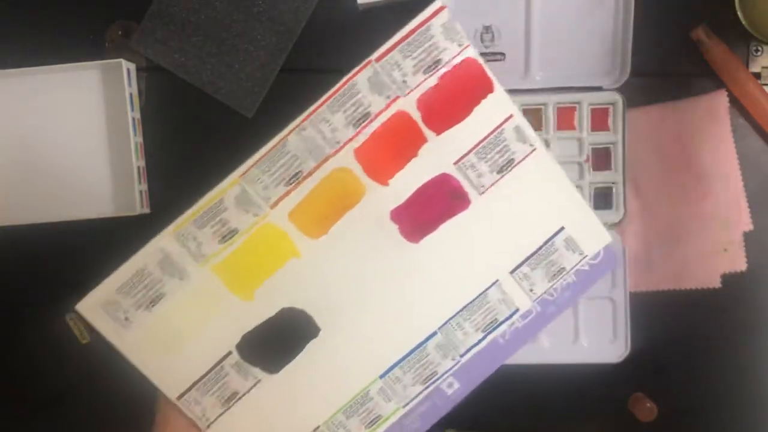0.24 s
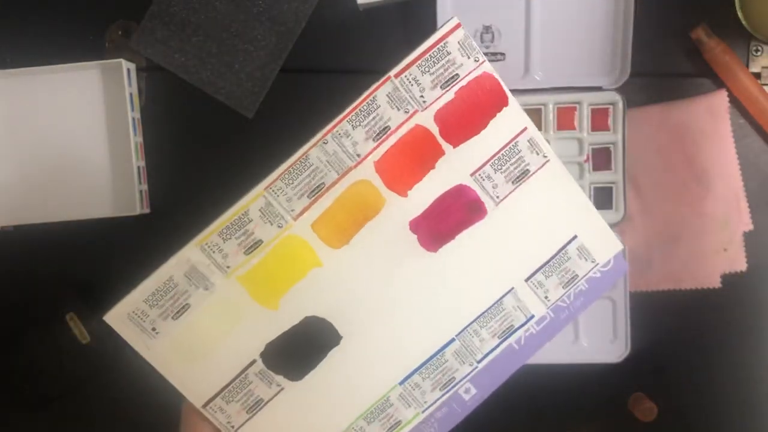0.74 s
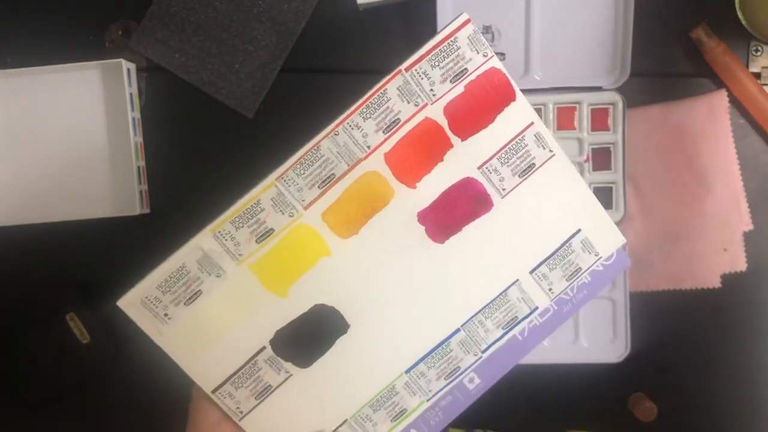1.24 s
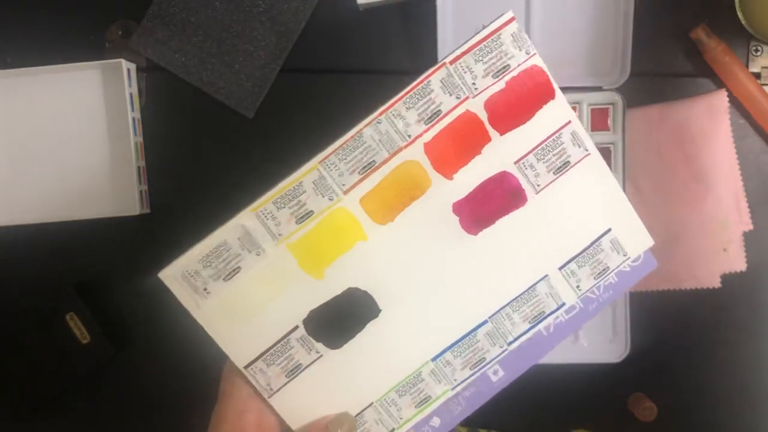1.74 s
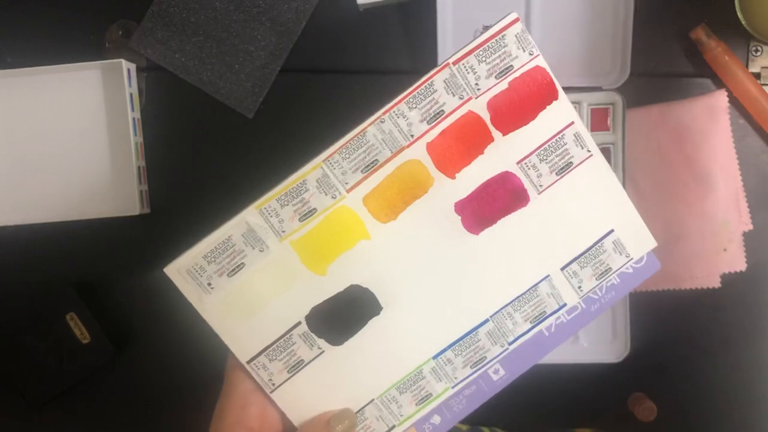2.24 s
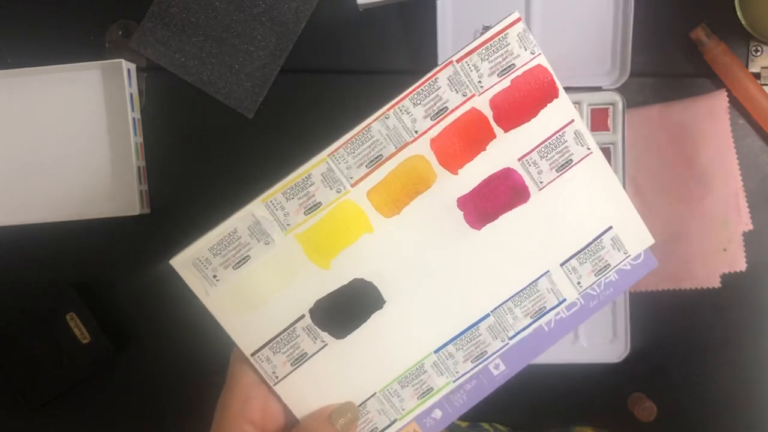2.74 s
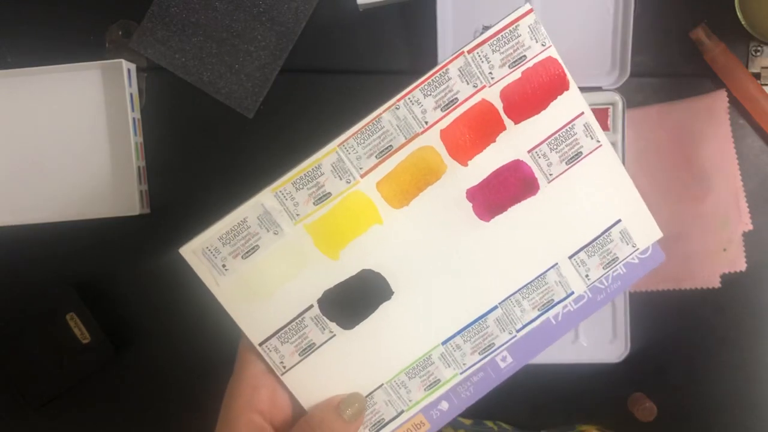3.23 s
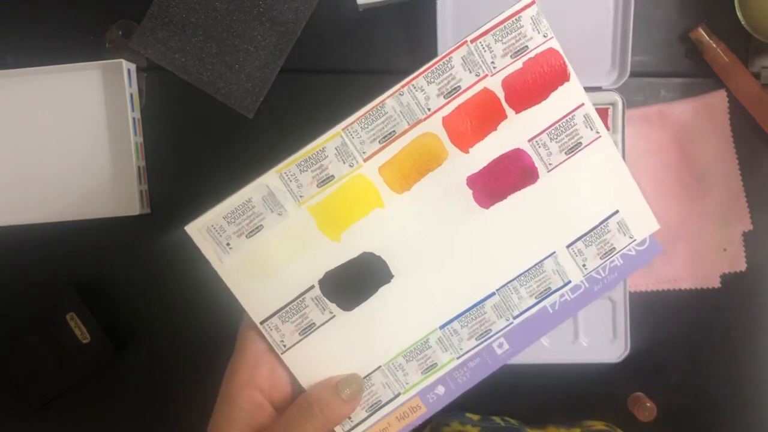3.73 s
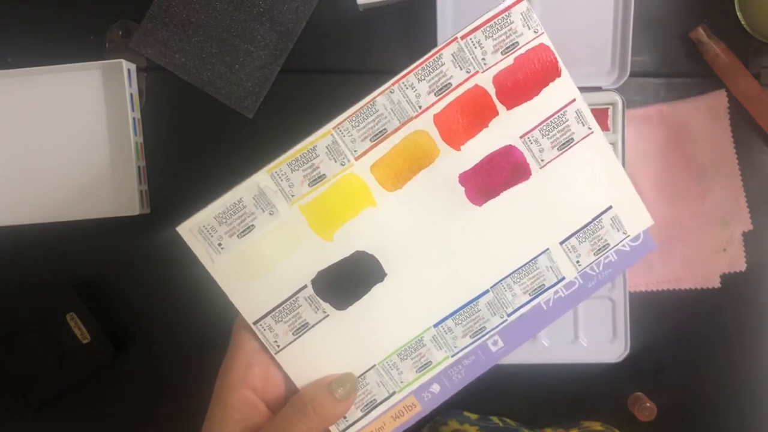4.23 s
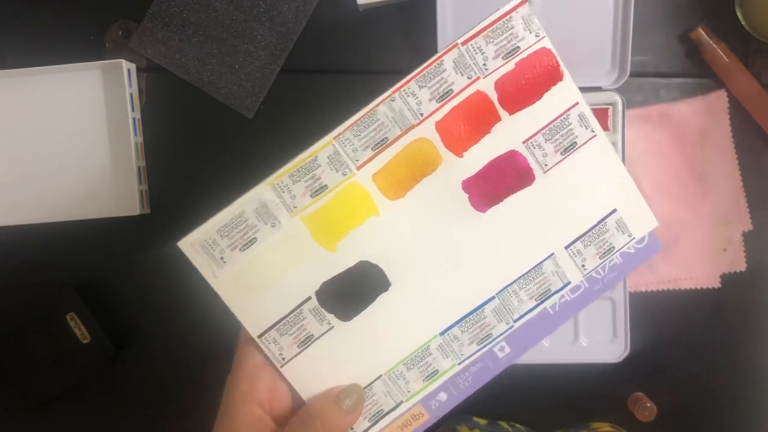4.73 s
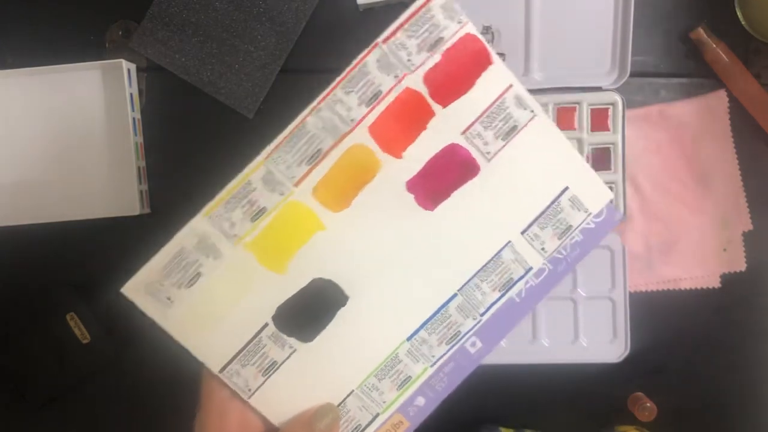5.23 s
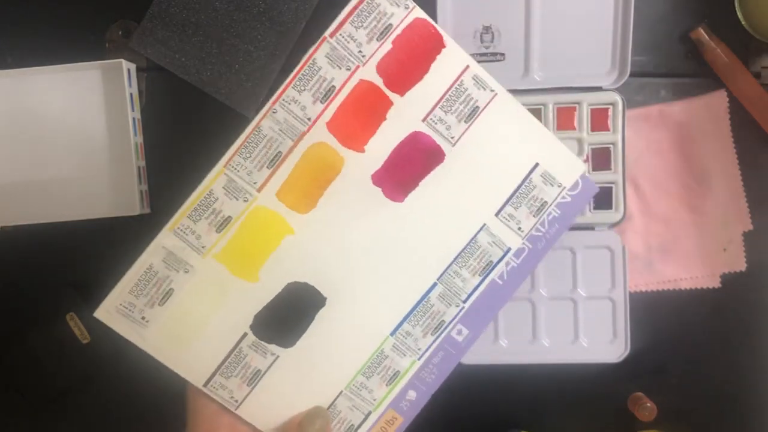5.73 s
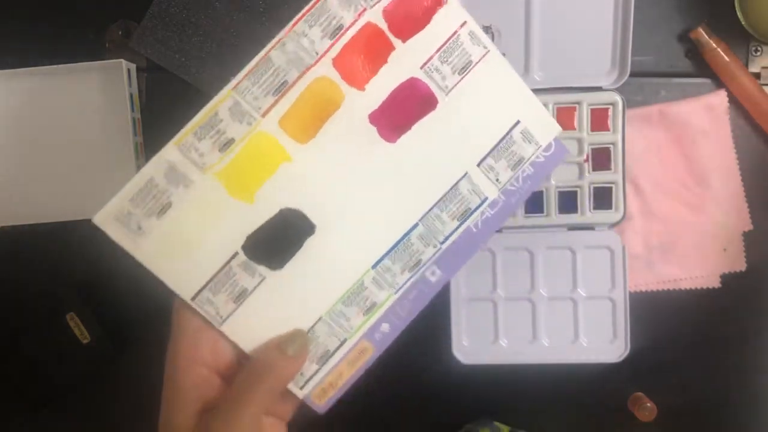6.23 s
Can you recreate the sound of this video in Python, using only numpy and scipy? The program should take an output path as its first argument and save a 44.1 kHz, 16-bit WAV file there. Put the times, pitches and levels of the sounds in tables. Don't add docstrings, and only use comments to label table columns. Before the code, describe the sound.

Sharp glassy clinks of a brush rinsed in a water jar, small bubbles popping between them, then a faint paper rustle over low room hum.

```python
import sys
import numpy as np
from scipy import signal
from scipy.fft import rfft, irfft, next_fast_len
from scipy.io import wavfile
from scipy.ndimage import uniform_filter1d

SR = 44100
rng = np.random.default_rng(int(sys.argv[2]) if len(sys.argv) > 2 else 0)


def invert_db(x):
    u = np.asarray(x, float) / 20
    return 10 ** u


def waveform_to_disk(signal):
    frames = np.transpose(np.atleast_2d(signal))
    scaled = np.clip(frames, -1, 1) * 32767
    samples = np.round(scaled).astype(np.int16)
    wavfile.write(sys.argv[1], SR, samples)


N = 285194

KNOCK_TIMES = [.5976, 1.0708, 3.1714, 4.0080, 4.3486]
# crack level in dB, crack T60 in seconds, ring T60 at 3 kHz in seconds,
# desk rumble level in dB, ring gain in dB.
KNOCKS = [
    (-18.5, .02, .43, -54, 2.5),
    (-19, .03, .34, -36, 6.5),
    (-23, 0.019, 0.33, -49, 4),
    (-12.5, 0.018, 0.43, -46, 2.5),
    (-24, 0.02, 0.43, -51, -1.5),
]
STIRRED_MODES = [3080, 3310, 3170, 3190, 3222, 4081, 4366, 5483, 5545, 6078, 6115, 6470, 7600, 8800, 10425,
                 10500, 11610, 12410, 12475, 13170, 14280]
DRAINED_MODES = [2930, 3031, 3074, 3321, 3128, 3149, 3182, 4237, 5145, 5190, 5647, 6037, 6063, 6590, 7698,
                 7854, 8829, 9690, 10110, 11445, 11990, 12070, 12750, 13050, 13088, 14190, 15460]
STIRRED_LEVELS = [(-54, -56, -26.5, -48, -32.5, -60, -63, -52, -69, -46, -49, -57, -62.5, -66.5, -45.5, -53.5, -59, -51, -53, -61, -62),
                  (-54, -56, -32, -41, -46, -61.5, -53, -52, -68.5, -44, -49, -59, -72, -68, -62, -64, -66, -65, -61, -66, -60),
                  (-78, -71.5, -55, -60, -64.5, -64, -60, -64, -56, -56, -55, -84, -69, -78, -62, -69, -90, -76, -59, -92, -82)]
DRAINED_LEVELS = [(-57.5, -56, -47, -58, -32, -40.5, -50, -63.5, -42.5, -46, -56, -39.5, -40, -68, -51, -46, -66, -49, -44, -44, -46, -41, -55, -37.5, -44, -56, -62),
                  (-55, -47, -45, -56, -44.5, -35, -40, -64, -54, -44.5, -75, -29, -31, -57, -74.5, -75, -82, -60, -56, -54, -56, -59, -80, -62, -66, -80, -57)]
# bend depth in Hz, period in seconds, random wander in Hz.
ROCKING = [(16, .19, 2), (20, .125, 3), (8, .15, 6), (8, .4, 3), (4, .3, 3)]
# frequency in Hz, level in dB per Hz.
CRACK_COLOUR = [(410, -54), (900, -33.5), (1660, -17.5), (3110, -8.5), (4500, -8.5), (6100, -7),
                (11500, -11), (16000, -13.5)]
# tilt in dB per octave, squeak in Hz, squeak level in dB.
CONTACTS = [(0, 6500, -8), (-5, 6050, 1), (-2.5, 9500, -10), (3, 7810, 1), (0, 4190, -10)]
# centre in Hz, T60 in seconds.
AFTERGLOW_BANDS = [(1500, .42), (2300, .42), (3400, .46), (4500, .48), (5800, .43), (7800, .36),
                   (10400, .35), (13800, .32)]
AFTERGLOW_LEVELS = [(-69, -64, -58, -60, -53, -56, -53, -57), (-56, -59, -45, -48, -47, -61, -59, -57),
                    (-60, -62, -61, -62, -60, -61, -65, -65), (-69, -59, -53, -53, -51, -50, -49, -47),
                    (-70, -67, -54.5, -58, -54.5, -63.5, -61, -73)]
# start in seconds, level in dB, pitch in Hz, T60 in seconds.
GLASS_TAPS = [(0.419, -57, 3176, 0.12), (.42, -62, 7830, .03), (1.872, -60, 11600, .09),
              (2.012, -64, 6100, .06), (.885, -58, 6100, .03), (0.886, -59, 11600, .045),
              (.886, -64, 9000, .06), (.948, -67.5, 5500, 0.29), (.949, -57, 6110, 0.068),
              (1.394, -52.5, 5650, 0.026), (1.443, -55, 5570, .038), (1.442, -54, 4100, 0.2),
              (1.571, -57, 3150, 0.059), (1.913, -50, 5250, 0.02), (2.163, -62, 7800, 0.038),
              (2.085, -61, 3160, 0.14), (2.55, -58.5, 3190, .1), (2.55, -69, 5530, 0.067),
              (2.909, -52, 1500, 0.085), (4.99, -64, 6100, .05), (3.0, -49, 6300, 0.09),
              (2.711, -56.5, 3110, 0.14), (2.765, -50, 3174, 0.12), (3.978, -59, 7930, .05),
              (4.804, -52, 5200, .35), (4.804, -54, 6060, 0.12), (4.803, -58, 4640, 0.099),
              (5.057, -54, 4210, 0.031)]
# start in seconds, level in dB, pitch in Hz, T60 in seconds.
THUDS = [(.04, -40, 438, 0.028), (1.076, -30.5, 290, 0.074), (1.076, -39, 625, 0.15),
         (1.076, -43, 800, .12), (1.079, -34.5, 106.6, 0.11), (1.129, -43.5, 96, 0.86),
         (1.111, -44, 239, 0.11), (1.532, -47.5, 645, 0.06), (3.18, -30.5, 241, 0.026),
         (4.017, -29, 360, 0.06), (4.029, -46, 444, 0.18)]
# start in seconds, level in dB, pitch in Hz, T60 in seconds.
DRIPS = [(0.727, -38, 2070, 0.05), (.795, -43, 2130, .025), (.834, -53, 1320, 0.042),
         (1.053, -42, 1834, 0.03), (1.159, -27, 1560, 0.018), (1.075, -51, 1730, .35),
         (1.062, -50, 3100, .03), (3.176, -49, 1620, 0.3), (1.315, -59, 2160, .029),
         (3.133, -47.5, 1534, 0.07), (3.142, -43, 1670, 0.042), (3.172, -30.5, 1646, 0.035),
         (4.484, -46, 1730, 0.019), (4.878, -39, 1834, 0.03), (5.057, -43, 1720, 0.13),
         (1.716, -54, 1730, 0.3), (2.083, -52, 1983, 0.28), (2.09, -64, 948, .5), (4.41, -56, 1750, 0.026)]
# start in seconds, level in dB, pitch
# in Hz.
BIG_BUBBLES = [(0.04, -57, 1970), (0.8827, -45, 2140), (0.8948, -42, 2005), (1.7121, -36, 1670),
               (1.7597, -51.5, 1650), (1.8534, -53.5, 1974), (1.9288, -49.5, 2196), (2.0746, -35.5, 2030),
               (2.0812, -37, 1835), (2.149, -46, 1990), (2.23, -35.5, 1515), (2.2762, -48, 1830),
               (2.3338, -46.5, 1510), (2.386, -47.5, 1810), (2.4606, -42, 2000), (2.4693, -32.5, 1608),
               (2.5475, -50, 1980), (2.6408, -44.5, 1656), (2.7026, -47.5, 1960), (2.7122, -46.5, 1960),
               (2.765, -51, 1930), (2.7967, -40.5, 1640), (2.869, -48, 1526), (2.9094, -42, 1910),
               (3.022, -43, 1730), (3.079, -48, 1890),
               (4.7418, -39, 2045), (4.7577, -34, 1510), (4.805, -45.5, 1960), (4.8244, -39.5, 1370),
                 (4.8783, -39, 1400), (4.983, -38, 1910), (5.0567, -36.5, 1983), (5.116, -54, 1704),
                 (5.295, -53, 1860), (5.3075, -48.5, 1910), (5.3196, -44, 1570), (5.3443, -52, 1570),
                 (5.3594, -48.5, 2236), (5.4286, -54, 2080), (5.5313, -55, 1975), (5.6455, -56, 1756)]
# start in seconds, level in dB, pitch in Hz.
SMALL_BUBBLES = [(0.041, -56, 3450), (0.883, -51, 4100), (0.8944, -47.5, 2540), (1.3814, -51, 4100),
                 (1.3944, -47.5, 2430), (1.4408, -50, 2590), (1.4562, -41, 2560), (1.62, -55.5, 2620),
                 (1.854, -48, 3000), (1.9139, -47.5, 2635), (1.928, -52, 3140), (2.0102, -55.5, 2530),
                 (2.0737, -47, 2450), (2.149, -50, 2500), (2.4606, -46, 3800), (2.5482, -57, 3100),
                 (2.6409, -49, 2530), (2.7648, -52.5, 3210), (2.786, -55.5, 3340), (3.0003, -48.5, 2463),
                 (4.6553, -60, 3910), (4.7571, -47.5, 3580), (4.8253, -40.5, 3040), (4.8788, -46, 2730),
                 (4.9686, -45, 5050), (5.0558, -44, 3000), (5.2182, -58, 3100), (5.344, -47.5, 2460),
                 (5.344, -52, 3000), (5.309, -54, 2530), (2.011, -58, 3200), (2.7115, -54, 1700),
                 (5.4415, -55, 2050), (5.3592, -42, 4000), (5.441, -61, 3000)]
CAVITY_MODES = [1330, 1520, 1640, 1710, 1830, 1970, 2090, 2480, 2640, 2810, 3000, 3180, 3450, 3900, 4150,
                4400]
# start in seconds, level in dB.
SPLASHES = [(0.895, -54), (1.9136, -54), (2.0104, -61.5), (2.0755, -43), (2.149, -57.5), (2.785, -58),
            (4.9684, -53), (4.9824, -58), (4.9967, -59), (5.0563, -51), (5.441, -59)]
# start in seconds, end in seconds.
STIRRING = [
    (.7, 1.0),
    (1.25, 3.15),
    (4.74, 5.55),
]
# start in seconds, level in dB, centre in Hz.
BRISTLES = [(.039, -61.5, 8150), (.43, -64, 5300), (.503, -65, 5300), (.503, -65, 7000), (0.799, -47, 2820),
            (1.6988, -62, 3480), (1.7108, -51.5, 2740), (1.768, -62, 2810), (2.011, -60, 4030),
            (2.011, -63, 6100), (2.073, -43, 5900), (2.157, -53, 4300), (2.183, -59, 4000),
            (2.2241, -60, 4100), (2.238, -60.5, 6250), (2.334, -62, 4730), (2.3927, -60, 2530),
            (2.41, -63.5, 4200), (2.469, -64, 5500), (2.55, -66, 5500), (2.6807, -57, 3510),
            (2.72, -61, 4500), (2.759, -53, 3530), (2.775, -57, 4000), (3.0, -57, 4800),
            (3.0235, -54, 3150), (3.0667, -55, 2530), (3.085, -58, 3200), (3.142, -52, 7660),
            (3.142, -59, 6400), (3.147, -56, 9800), (3.158, -52, 5200), (3.398, -61, 8000),
            (4.075, -56, 2040), (4.408, -58, 2070), (4.485, -50, 2700), (4.671, -61, 7000),
            (4.696, -62, 7480), (5.115, -56, 4400), (5.162, -60, 3900), (5.218, -60, 3800),
            (5.535, -58, 4420), (4.805, -56, 2700), (4.83, -54, 4500), (4.942, -64, 3000),
            (4.942, -65, 6500), (5.175, -62, 5000), (5.322, -62, 5020), (5.52, -60.5, 1950),
            (2.35, -63, 3000), (2.49, -63, 2480), (2.7, -63, 7000), (3.79, -60.5, 800), (2.2, -60, 860),
            (2.09, -58, 700), (2.13, -58, 620)]
# crest in seconds, level in dB.
SURGES = [(0, -68), (1.12, -55), (2.12, -66), (3.8, -71), (4.1, -69)]
# start in seconds, level in dB, centre in Hz.
TICKS = [(.4189, -60, 7830), (0.8833, -46, 10000), (1.4564, -51, 10100), (1.488, -40, 11600),
         (1.6453, -50, 7180), (1.8711, -60, 10700), (2.073, -40.5, 8200), (2.1615, -51, 7850),
         (2.229, -40, 14400), (2.337, -41, 14000), (2.392, -43.5, 9100), (2.52, -52.5, 10700),
         (2.872, -46, 10900), (3.134, -48, 8810), (3.4096, -50.5, 10620), (3.505, -51, 8760),
         (3.6194, -55, 11300), (3.7334, -52.5, 10070), (4.571, -48, 13600), (4.7358, -51, 7850),
         (4.8115, -50, 8100), (4.8886, -42, 9000), (4.9853, -44, 9500), (5.0553, -43, 8500),
         (5.6077, -52.5, 12600), (5.9484, -54, 14400), (6.324, -52.5, 8900), (6.347, -48, 10970),
         (3.152, -52, 14000), (.948, -54, 10500), (1.315, -56, 8600), (1.385, -58, 12800),
         (3.96, -55, 15200), (3.988, -57, 12500), (4.228, -56, 13500), (4.268, -58, 12000),
         (4.425, -55, 7500), (4.556, -56, 13500), (4.668, -56, 13200), (.42, -58, 5000), (1.052, -57, 9000)]
# time in seconds, level in dB.
RUSTLES = [
    [(5.70, -90), (5.76, -68.5), (5.82, -70), (5.88, -83.5)],
    [(6.449, -86), (6.454, -50.5), (6.467, -53.5)],
]
# frequency in Hz, level in dB per Hz.
RUSTLE_COLOURS = [
    [(800, 1), (2000, -2.5), (5000, -2.5), (9000, -9), (16000, -12)],
    [(1200, -10), (2000, 2), (4000, -27), (8300, 8), (10500, -0.5), (16000, -14)],
]
# delay in seconds, level in dB.
ECHOES = [(.0075, -16.5), (0.018, -22)]
# band centre in Hz, T60 in seconds, level in dB.
ROOM = [(300, 0.29, -5), (1500, 0.47, -9.5), (3000, .5, -11.5), (5200, 0.49, -14), (9000, .3, -17.5),
        (14500, 0.09, -15)]
# frequency in Hz, level in dB per Hz.
AIR_COLOUR = [(28, -5.5), (36, 1.5), (45, 17), (70, 19.5), (160, 13.5), (250, 8.5), (500, 1), (850, -2),
              (1150, -9.5), (2000, -9.5), (3500, -12.5), (6000, -16.5), (10000, -20), (16000, -23.5)]
# centre in Hz, width in Hz, level in dB.
HUM = [(99.4, 41, -62), (111, 52, -64.5), (148, 7.4, -72.5)]
# time in seconds, level in dB.
BOOM_SWELL = [(0.0, -73.5), (0.2, -66), (0.63, -60), (0.68, -83), (0.97, -52.5), (1.35, -69), (1.46, -57.5),
              (3.4, -64.5), (3.62, -52), (3.83, -68), (4.37, -54.5), (4.46, -79), (4.73, -54), (5.0, -64),
              (5.11, -49.5), (5.38, -69.5), (5.59, -51.5), (6.46, -63.5)]


def unit(x):
    return x / np.sqrt(np.mean(x ** 2))


def fade(t, t60):
    return np.exp(-np.log(1000) * t / max(t60, 1e-3))


def onset(t, rise_s):
    return 1 - np.exp(-t / rise_s)


def sine(turns):
    return np.sin(2 * np.pi * turns)


def coloured(table, size):
    hz, db = np.transpose(table)
    fast = next_fast_len(size)
    octave = np.log2(np.maximum(np.fft.rfftfreq(fast, 1 / SR), 1))
    knots = np.log2(hz)
    skirt_db = 30 * abs(octave - np.clip(octave, knots[0], knots[-1]))
    gain = invert_db(np.interp(octave, knots, db) - skirt_db)
    return unit(irfft(rfft(rng.standard_normal(fast)) * gain, fast)[:size])


def walk(rate, size=N):
    hold = int(SR / rate)
    steps = np.repeat(rng.standard_normal(size // hold + 1), hold)
    return unit(uniform_filter1d(uniform_filter1d(steps, hold), hold)[:size])


def add(out, s, x):
    i = int(s * SR)
    out[i:i + len(x)] += x[:len(out) - i]


def flutter(t, depth_db, rate):
    return invert_db(depth_db * walk(rate, size=len(t)) * onset(t, 0.015))


def rocking(t, depth_hz, period, wander_hz):
    swing = depth_hz * np.cos(2 * np.pi * t / period) * np.exp(-t / 0.19)
    return np.cumsum(wander_hz * walk(25, size=len(t)) - swing) / SR


def glass(t, hz, db, t60, bend):
    damping, swell_cycles = 0.3, 6.8
    first_ring = invert_db(-1.5) * fade(t, 0.1)
    ring = fade(t, t60 * (3000 / hz) ** damping) * (1 + first_ring)
    rough = 1 + invert_db(-8) * hz / 1e4 * walk(260, size=len(t))
    gain = invert_db(db) * flutter(t, 2.5, 60) * rough * onset(t, swell_cycles / hz)
    return gain * ring * sine(hz * t + bend)


def knocks():
    out, t = np.zeros(N), np.arange(SR // 2) / SR
    desk_colour = [(100, -14.5), (200, 3), (450, -0.5), (900, -3.5), (1600, -20.5)]
    pitches = [STIRRED_MODES] * len(STIRRED_LEVELS) + [DRAINED_MODES] * len(DRAINED_LEVELS)
    levels = STIRRED_LEVELS + DRAINED_LEVELS
    for s, knock, modes, strengths, rock in zip(KNOCK_TIMES, KNOCKS, pitches, levels, ROCKING):
        _, _, t60, desk_db, ring_db = knock
        depth, period, wander = rock
        ring = np.zeros(len(t))
        for hz, db in zip(modes, strengths):
            bend = rocking(t, depth, period, wander * (hz / 3150) ** 1.3)
            ring += glass(t, hz, db, t60, bend)
        add(out, s, invert_db(ring_db) * ring)
        desk = coloured(desk_colour, len(t)) * fade(t, 0.18) * onset(t, 0.001)
        add(out, s, invert_db(desk_db) * desk)
    return out


def crack(t, tilt_db, hz, squeak_db):
    colour = [(f, db + tilt_db * np.log2(f / 4000)) for f, db in CRACK_COLOUR]
    return coloured(colour, len(t)) + invert_db(squeak_db) * sine(hz * t) * fade(t, 0.03)


def cracks():
    out, t = np.zeros(N), np.arange(SR // 10) / SR
    for s, (crack_db, t60, *_), contact in zip(KNOCK_TIMES, KNOCKS, CONTACTS):
        add(out, s, invert_db(crack_db) * crack(t, *contact) * fade(t, t60) * onset(t, 0.00013))
    return out


def afterglow():
    out, t = np.zeros(N), np.arange(SR // 2) / SR
    for s, levels in zip(KNOCK_TIMES, AFTERGLOW_LEVELS):
        for (hz, t60), db in zip(AFTERGLOW_BANDS, levels):
            colour = [(hz / 1.35, -16), (hz / 1.14, 0), (hz * 1.14, 0), (hz * 1.2, -12)]
            add(out, s, invert_db(db) * coloured(colour, len(t)) * fade(t, t60) * onset(t, 0.002))
    return out


def thuds_taps_and_drips():
    out = np.zeros(N)
    for s, db, hz, t60 in THUDS + GLASS_TAPS + DRIPS:
        t = np.arange(SR // 4 if hz > 2200 else SR // 2) / SR
        wet = min(hz / 1500, 1)
        tone = flutter(t, 4 * wet, 90) * sine(hz * t + wet * rocking(t, 0, 1, 16))
        add(out, s, invert_db(db) * tone * fade(t, t60) * onset(t, 0.55 / hz))
    return out


def bubble(t, hz, cycles, glide, jar_db, spray_db, linger_db):
    ring = sine(hz * t * (1 + glide * t * hz / cycles)) * fade(t, cycles / hz)
    modes = np.array(CAVITY_MODES)[:, None]
    share_db = -14 * abs(np.log2(modes / hz)) + 4.5 * rng.standard_normal(modes.shape)
    jar = np.sum(invert_db(share_db) * sine(modes * t + rng.random(modes.shape)), axis=0) * fade(t, 0.035)
    spray_colour = [(hz / 1.6, -25), (hz / 1.15, -4), (hz, 0), (hz * 1.4, -6), (hz * 2.2, -25)]
    spray = coloured(spray_colour, len(t)) * fade(t, 0.039)
    linger_colour = [(hz / 1.15, -22), (hz / 1.02, 0), (hz * 1.07, 0), (hz * 1.25, -22)]
    linger = coloured(linger_colour, len(t)) * fade(t, 0.26)
    pop = ring + invert_db(jar_db) * jar + invert_db(spray_db) * spray + invert_db(linger_db) * linger
    return pop * onset(t, 3 / hz)


def tick(t, hz, t60):
    colour = [(hz / 2.5, -30), (hz / 1.3, -8), (hz, 0), (hz * 1.3, -7), (hz * 2.5, -24)]
    return coloured(colour, len(t)) * fade(t, t60) * onset(t, 0.0005)


def bubbles_and_splashes():
    out, t = np.zeros(N), np.arange(SR // 5) / SR
    early = 0.001
    for s, db, hz in BIG_BUBBLES:
        pop = bubble(t, hz, cycles=58, glide=0.08, jar_db=-20, spray_db=-17, linger_db=-24)
        add(out, s - early, invert_db(db + 3) * pop)
    for s, db, hz in SMALL_BUBBLES:
        pop = bubble(t, hz, cycles=90, glide=0.055, jar_db=-18.5, spray_db=-14, linger_db=-24)
        add(out, s - early, invert_db(db + 2.5) * pop)
    for s, db in SPLASHES:
        add(out, s - early, invert_db(db + 6) * tick(t, 5270, 0.0063))
    return out


def fizz():
    out, t = np.zeros(N), np.arange(SR // 20) / SR
    per_s, level_db, spread_db = 110, -65.5, 1.6
    for start, end in STIRRING:
        length = end - start
        for when, pitch, size in rng.random((int(per_s * length), 3)):
            hz = 1400 * 3.2 ** pitch
            chirp = sine(hz * t * (1 + 3 * t)) * fade(t, 27 / hz)
            add(out, start + when * length, invert_db(level_db - spread_db * np.log(size)) * chirp)
    return out


def bristles():
    out, t = np.zeros(N), np.arange(SR // 16) / SR
    for s, db, hz in BRISTLES:
        colour = [(hz / 1.25, -24), (hz / 1.05, -3), (hz * 1.05, -3), (hz * 1.25, -24)]
        add(out, s, invert_db(db) * coloured(colour, len(t)) * fade(t, 70 / hz) * onset(t, 0.0004))
    wash = coloured([(1100, -7.5), (1700, 0.5), (3000, -2.5), (4500, -7.5), (7000, -16.5)], N)
    return out + invert_db(-70) * wash * fade(np.arange(N) / SR, 2.2)


def slosh():
    t = np.arange(N) / SR
    rise_s, ebb_t60 = 0.033, 0.57
    gain = invert_db(-68.5 - 2 * t)
    for s, db in SURGES:
        rise = np.exp(np.minimum(t - s, 0) / rise_s)
        gain = gain + invert_db(db) * rise * fade(np.maximum(t - s, 0), ebb_t60)
    colour = [(150, -21), (300, 3), (600, -3.5), (950, -2.5), (1300, -24.5)]
    return gain * invert_db(2.5 * walk(25)) * coloured(colour, N)


def ticks():
    out, t = np.zeros(N), np.arange(SR // 30) / SR
    stray_per_s, stray_db = 2, -62
    draws = rng.random((stray_per_s * N // SR, 2))
    stray = [(when * N / SR, stray_db, 7200 * 2 ** pitch) for when, pitch in draws]
    for s, db, hz in TICKS + stray:
        add(out, s, invert_db(db - 2) * tick(t, hz, 0.0067))
    return out


def rustle():
    out, t = np.zeros(N), np.arange(N) / SR
    for curve, colour in zip(RUSTLES, RUSTLE_COLOURS):
        s, db = np.transpose(curve)
        level = np.interp(t, s, invert_db(db), left=0, right=0)
        out += level * coloured(colour, N) * invert_db(1.8 * walk(151.5))
    return out


def room(x):
    t, tail = np.arange(SR // 2) / SR, np.zeros(SR // 2)
    for hz, t60, db in ROOM:
        band = coloured([(hz / 2, -20), (hz / 1.3, 0), (hz * 1.3, 0), (hz * 2, -20)], len(t))
        band = band * fade(t, t60) * onset(t, 0.00036)
        tail += invert_db(db) * band / np.sqrt(np.sum(band ** 2) * SR / 2 / hz)
    for s, db in ECHOES:
        add(tail, s, invert_db([db]))
    return signal.fftconvolve(x, tail)[:N]


def air():
    t, hum = np.arange(N) / SR, np.zeros(N)
    for hz, w, db in HUM:
        colour = [(hz - 2 * w, -40), (hz - w / 2, -3), (hz, 0), (hz + w / 2, -3), (hz + 2 * w, -40)]
        hum += invert_db(db + walk(2.4)) * coloured(colour, N)
    boom_hz = 53 + 3 * walk(7.3)
    boom_db = 2 + np.interp(t, *np.transpose(BOOM_SWELL)) + 2.5 * walk(7)
    boom = invert_db(boom_db) * sine(np.cumsum(boom_hz) / SR)
    return invert_db(-60.5 + 0.8 * walk(6.1)) * coloured(AIR_COLOUR, N) + hum + boom


def scene():
    rings = knocks() + fizz() + bristles()
    snaps = cracks()
    wet = bubbles_and_splashes() + thuds_taps_and_drips()
    walls = room(rings + invert_db(-9) * snaps + invert_db(-1.5) * wet)
    jar = rings + snaps + wet + walls + afterglow()
    return (jar + ticks() + slosh() + rustle() + air())[None]


def low_pass(x):
    return signal.sosfilt(signal.butter(12, 16880, fs=SR, output="sos"), x)


def record(dry):
    lowpass = signal.ellip(8, 0.3, 60, 15750, fs=SR, output="sos")
    mix = signal.sosfilt(lowpass, dry)
    return low_pass(mix)


dry = scene()
out = record(dry)
waveform_to_disk(out)
```